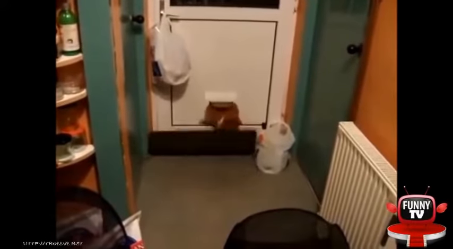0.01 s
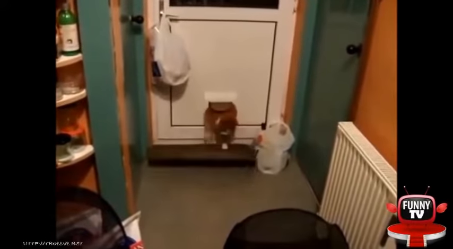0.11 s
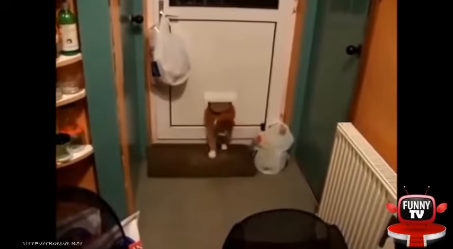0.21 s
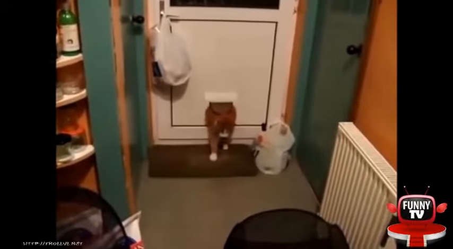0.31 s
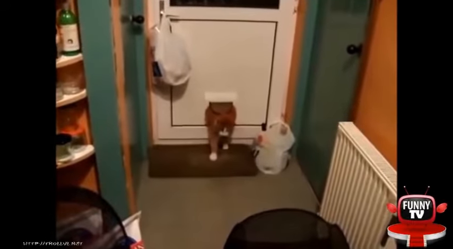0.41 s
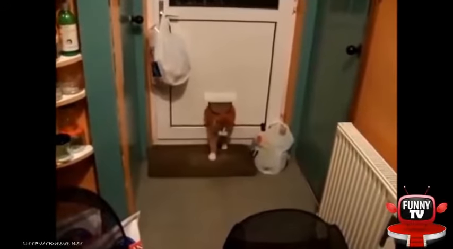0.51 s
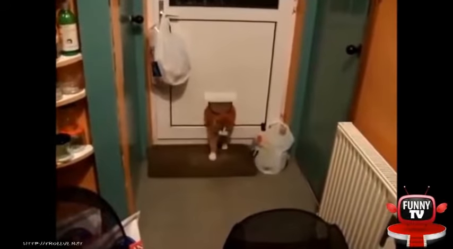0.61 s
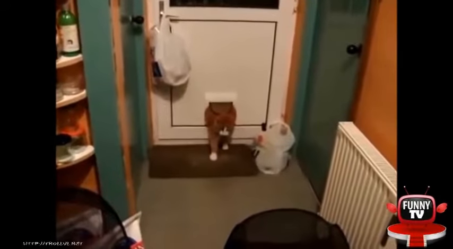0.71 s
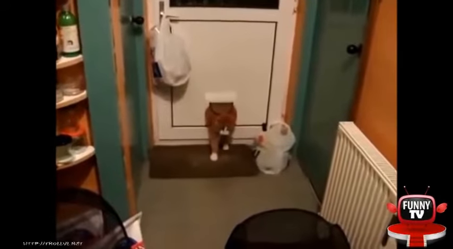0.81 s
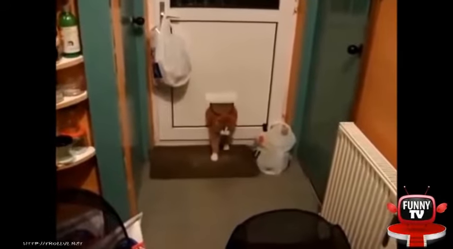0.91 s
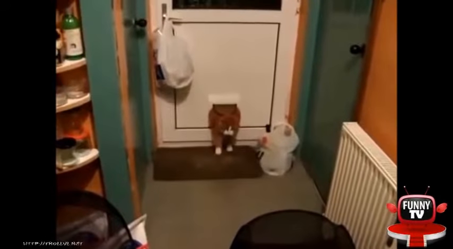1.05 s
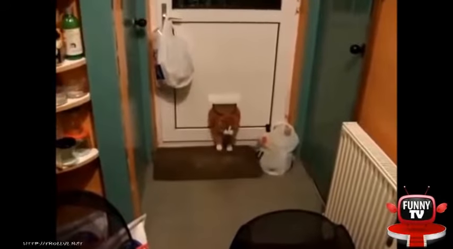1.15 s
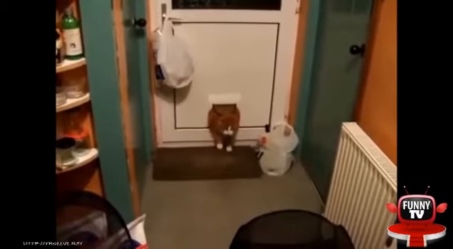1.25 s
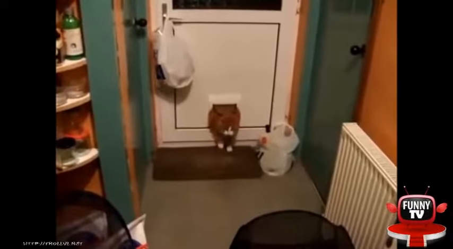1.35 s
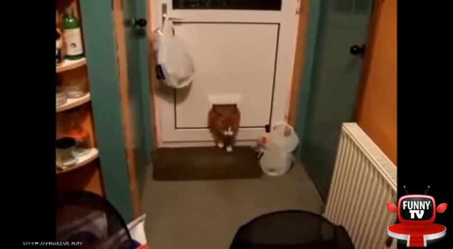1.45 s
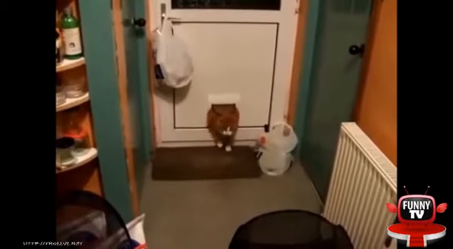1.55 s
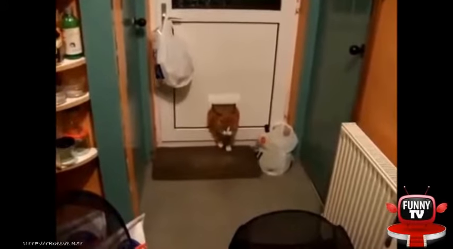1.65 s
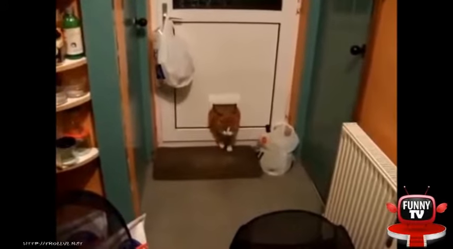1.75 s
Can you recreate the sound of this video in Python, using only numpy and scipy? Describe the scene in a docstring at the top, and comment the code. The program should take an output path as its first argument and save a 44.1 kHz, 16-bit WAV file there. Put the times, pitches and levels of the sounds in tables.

```python
"""In a small hallway, a cat squeezes through a plastic flap in the back door.
Random slips make the flap hiss over its fur, gliding tones make it creak, and soft pushes shake the door.
The flap slams and rattles: each blow mixes noise bursts with the ringing of the door and the flap's rim.
A short squeaky scuff and a soft paw fall follow. Wavering tones make a faint appliance hum under hiss."""
import sys
import numpy as np
from scipy import signal
from scipy.fft import rfft, irfft
from scipy.io import wavfile
from scipy.ndimage import uniform_filter1d, map_coordinates

SR = 44100
rng = np.random.default_rng(int(sys.argv[2]) if len(sys.argv) > 2 else 0)


def int16_out(signal):
    """Quantize to a 16-bit WAV file."""
    q = np.round(np.clip(np.atleast_2d(signal).T, -1, 1) * 32767)
    wavfile.write(sys.argv[1], SR, q.astype(np.int16))


N = 79380  # length in samples: 1.8 s


def amp(db):
    """Turn decibels into gain."""
    return 10 ** (np.asarray(db) / 20)


def unit(x):
    """Scale x to an rms of 1."""
    return x / np.sqrt(np.mean(x ** 2) + 1e-20)


def clock():
    """The time of every sample, in seconds."""
    return np.arange(N) / SR


def bins():
    """The frequencies of a spectrum of 2 * N samples, in Hz."""
    return np.fft.rfftfreq(2 * N, 1 / SR)


def along(points, hz):
    """Join (f/Hz, value) points by straight lines on a log frequency axis."""
    f, v = np.transpose(points)
    return np.interp(np.log(hz + 1), np.log(f + 1), v)


RELEASE_DB_PER_S = 907  # how steeply a layer fades before its first point and after its last


def level(rows):
    """Gain that follows (t/s, level/dB) points and fades quickly outside them."""
    s, db = np.transpose(rows)
    t = clock()
    seconds_outside = np.abs(t - np.clip(t, s[0], s[-1]))
    return amp(np.interp(t, s, db) - RELEASE_DB_PER_S * seconds_outside)


def wobble(rate):
    """A smooth random curve with `rate` random points a second."""
    knots = rng.standard_normal(int(N * rate / SR) + 4)
    return map_coordinates(knots, [clock() * rate])


def coloured(x, points):
    """Filter x by (f/Hz, level/dB) points, without pre-echo, keeping the power of white noise."""
    gain = unit(amp(along(points, bins())))
    # folding the cepstrum forward in time makes the filter respond only after its input
    cepstrum = irfft(np.log(gain))
    cepstrum[1:N] *= 2
    cepstrum[N + 1:] = 0
    return irfft(rfft(x, 2 * N) * np.exp(rfft(cepstrum)))[:N]


def fade(t, t60):
    """Exponential decay that drops 60 dB in t60 seconds."""
    return np.exp(-np.log(1000) * t / np.maximum(t60, 1e-3))


def at(s, x):
    """Delay x so that it starts at s seconds."""
    return np.pad(x, (max(round(s * SR), 0), 0))[:N]


def ring(modes, attack_s):
    """A struck body rings as a sum of dying sines, with a softened start."""
    t = clock()
    sines = sum(amp(db) * fade(t, t60) * np.sin(2 * np.pi * hz * t) for hz, db, t60 in modes)
    return sines * (1 - np.exp(-t / attack_s))


def tone(hz, waver, rate):
    """A sine of rms 1 whose pitch wavers at random."""
    unsteady_hz = hz * (1 + waver * wobble(rate))
    return np.sqrt(2) * np.sin(2 * np.pi * np.cumsum(unsteady_hz) / SR)


PATCHY_DB = 2.5  # how unevenly the rubbing lights up the resonances


def friction(colour, slips_per_s, smooth):
    """Rubbing is tiny random slips over a smooth hiss, patchy in time and pitch, coloured by the body."""
    slips = (rng.random(N) < slips_per_s / SR) * rng.standard_normal(N)
    z = signal.stft(unit(slips) + smooth * rng.standard_normal(N), nperseg=512)[2]
    patches = uniform_filter1d(rng.standard_normal(z.shape), size=4, axis=0)
    patches = uniform_filter1d(patches, size=7, axis=1)
    rub = signal.istft(z * amp(PATCHY_DB * unit(patches)), nperseg=512)[1][:N]
    return unit(coloured(rub, colour))


# the flap's contacts with its frame: t/s, direction (1 closing, -1 rebounding),
# door ring level/dB, knock level/dB (the noise part also takes RATTLE_DB), click level/dB
BLOWS = [ (.4484, 1, -30.5, -33, -40), (.455, 1, -38.5, -29, -33), (0.466, 1, -55, -42, -25),
         (.4699, -1, -32.5, -21, -24), (.4727, 1, -22, -7, -13.5), (.4767, -1, -15.5, -10.5, -36),
         (.5224, 1, -34, -28, -49), (.5334, -1, -37, -25.5, -47), (.5507, -1, -28, -30, -49), ]
# ringing of the door panel: f/Hz, relative level/dB, t60/s
DOOR = [(85, -16, .32), (148, -11.5, .39), (198, -8.5, .37), (285, -4.5, .32), (317, -1.5, .15),
        (341, -2, .3), (360, 9.5, .07), (378.5, -4, .3), (429.5, -4.3, .38), (539, -12, .31), (585, 6, .04),
        (770, -22, .25), (835, -16, .2), (902, -19, .36)]
# ringing of the flap's hard rim and catch: f/Hz, level/dB before RIM_DB, t60/s
RIM = [(1522, 6.5, 0.049), (2670, -23, 0.2), (2875, 4, 0.025), (7370, -9, 0.16), (8000, -22, 0.045),
       (8700, -15, 0.17)]
# tone colour of the hollow frame's knock: f/Hz, relative level/dB
KNOCK_COLOUR = [(30, -21), (55, -6.5), (90, 0.5), (150, 1), (195, 0), (245, -4.5), (320, 6), (430, 4.5),
                (500, -2.5), (590, -3), (700, -7.5), (850, -8.5), (1100, -8), (1600, -14), (2200, -19),
                (3000, -19.5), (6000, -29.5), (12000, -72)]
# tone colour of the rim's click: f/Hz, relative level/dB
CLICK_COLOUR = [(500, 8.5), (1500, -10), (2900, -1), (4300, 1.5), (5400, -21), (6700, 3), (7350, 6),
                (7800, 4.5), (8500, -3), (9400, -33), (11200, -4), (13500, -27), (15200, -14)]
KNOCK_T60, CLICK_T60 = 0.042, 0.03  # s
RATTLE_DB, RIM_DB = -1, -11  # the frame's noisy knock; the rim's ring within the click
PUSH_S, PUSH_DB = .0011, 2.5  # the flap's shove of air: width, and level relative to the knock
CLICK_LEAD_S = .0014  # the rim touches just before the whole flap lands
HALL_KNOCK_DB, HALL_CLICK_DB = -4.5, -15  # reverb on each


def flap_slam():
    """Each contact clicks the rim, knocks the frame and rings the door; rebounds push the other way."""
    t = clock()
    door = ring(DOOR, attack_s=0.0031)
    rim = amp(RIM_DB) * ring(RIM, attack_s=0.00023)
    push = amp(PUSH_DB) * shove(PUSH_S)
    out = np.zeros(N)
    for s, direction, door_db, knock_db, click_db in BLOWS:
        knock = coloured(rng.standard_normal(N) * fade(t, KNOCK_T60), KNOCK_COLOUR)
        click = coloured(rng.standard_normal(N) * fade(t, CLICK_T60), CLICK_COLOUR) + rim
        panel = -np.sign(direction) * (amp(door_db) * door + amp(knock_db) * push)
        out += at(s, panel + amp(knock_db + RATTLE_DB) * hallway(knock, HALL_KNOCK_DB))
        out += at(s - CLICK_LEAD_S, amp(click_db) * hallway(click, HALL_CLICK_DB))
    return out


PUSH_LOW_HZ = 125  # pitches below this are weakened


def shove(width_s):
    """A flat panel pushes the air once: a short swing under a bell curve, with the deep bass removed."""
    u = clock() / (2 * width_s)
    pulse = np.sin(np.pi * u) * np.exp(-u ** 2)
    highpass = signal.butter(2, PUSH_LOW_HZ, 'highpass', fs=SR, output='sos')
    return signal.sosfilt(highpass, pulse)


# hiss of the flap dragging over the cat's fur: t/s, level/dB before FUR_DB
FUR = [(0, -66), (.03, -48), (.052, -71), (.079, -53), (.083, -44), (.13, -34.5), (.166, -30.5), (.21, -31),
       (.24, -35.5), (.265, -31.5), (.35, -37), (.42, -36), (.462, -30.5), (.47, -28)]
# fur still brushing the frame after the slam: t/s, level/dB
RUSTLE = [(.5, -40.5), (.58, -51.5), (.615, -47), (.64, -55), (.662, -46), (.695, -57), (.725, -71)]
# scrape of the plastic: t/s, level/dB before SCRAPE_DB
SCRAPE = [(0, -57), (.028, -40), (.05, -49.5), (.0785, -58), (.0815, -33.5), (.108, -39), (.135, -44.5),
          (.155, -33.5), (.24, -40), (.268, -31), (.33, -37), (.425, -49), (.452, -34), (.468, -30)]
# low rumble of the door: t/s, level/dB before SHUDDER_DB
SHUDDER = [(.0, -56.5), (.13, -57), (.175, -45), (.2, -36), (.24, -30), (.268, -29), (.3, -28), (.34, -39),
           (.37, -45.5), (.41, -51.5), (.44, -36.5)]
# tone colours of fur, scrape and rumble: f/Hz, relative level/dB
FUR_COLOUR = [(600, -36), (1500, -6.5), (2400, 0), (3100, -2.5), (5000, 2), (7400, 2), (8300, -4.5),
              (9200, -11.5), (11800, -11), (13200, -24), (15500, -21.5)]
SCRAPE_COLOUR = [(250, -34), (520, 0), (640, -6), (820, 1), (960, -6), (1100, -3), (1400, -17), (2600, -11),
                 (5000, -21.5), (9000, -48)]
SHUDDER_COLOUR = [(30, -25), (80, -10), (150, 0.5), (240, -5.5), (310, 3.5), (360, -1.5), (430, -7),
                  (520, -9), (900, -72.5)]
FUR_DB, SCRAPE_DB, SHUDDER_DB = -2, 0, -1.5
HALL_SOFT_DB = -9.5  # reverb on the soft sounds: the drag and the steps


def flap_drag():
    """The flap rides over the cat's back: friction of fur and plastic, creaks, and a shuddering door."""
    fur_level = amp(FUR_DB) * level(FUR) + level(RUSTLE)
    fur = fur_level * friction(FUR_COLOUR, slips_per_s=3200, smooth=1.3)
    scrape = amp(SCRAPE_DB) * level(SCRAPE) * friction(SCRAPE_COLOUR, slips_per_s=660, smooth=0.72)
    shudder = amp(SHUDDER_DB) * level(SHUDDER) * friction(SHUDDER_COLOUR, slips_per_s=600, smooth=1.07)
    return hallway(fur + scrape + shudder + creaks() + bumps(), HALL_SOFT_DB)


# squeaks of the flap as it is pushed up: start t/s, length/s, first f/Hz, last f/Hz,
# level/dB, pitch waver (fraction of f)
CREAK = [(0.0803, 0.012, 720, 695, -41, 0.13), (0.0804, 0.019, 2400, 2760, -41, 0.07),
         (0.092, 0.037, 433, 415, -35.5, .012), (0.11, 0.076, 796, 773, -39.5, 0.02),
         (0.091, 0.02, 1126, 1165, -44, 0.04), (0.118, 0.053, 1175, 1139, -42, 0.03),
         (0.117, 0.029, 2060, 2190, -51, .01), (0.152, .022, 2610, 2540, -48, 0),
         (0.192, 0.051, 300, 320, -33.5, 0), (0.215, 0.023, 1032, 1047, -35.5, 0),
         (0.249, 0.03, 397.8, 336, -28.5, .06), (0.259, 0.025, 2500, 2380, -44, .05),
         (0.313, 0.013, 2845, 2690, -46, 0.1), (0.313, .024, 1796, 1860, -42.5, 0.04),
         (0.326, 0.017, 815, 852, -34, .008)]


def creaks():
    """Plastic sticks and slips: short gliding squeaks, some clean, some raspy."""
    out = np.zeros(N)
    for s, length, start_hz, end_hz, db, waver in CREAK:
        progress = np.clip((clock() - s) / length, 0, 1)
        swell = np.sqrt(np.abs(np.sin(np.pi * progress)))
        hz = start_hz + (end_hz - start_hz) * progress
        out += amp(db) * swell * tone(hz, waver, rate=500)
    return out


# nudges of the cat's body against the door: t/s, level/dB
BUMPS = [(0.141, -39), (0.192, -28), (0.236, -24), (0.268, -33.5), (.288, -28), (.31, -35.5), (.35, -40)]
BUMP_S, BUMP_RING_DB, BUMP_T60 = 0.0021, -12, .2  # push width/s, door ring level, extra damping t60/s


def bumps():
    """The cat's body nudges the door softly and damps its ring."""
    damped_ring = ring(DOOR, attack_s=.004) * fade(clock(), BUMP_T60)
    thud = shove(BUMP_S) + amp(BUMP_RING_DB) * damped_ring
    return sum(at(s, amp(db) * thud) for s, db in BUMPS)


# the scuff as the cat steps off the mat: t/s, level/dB
SCUFF = [(1.202, -54), (1.209, -44), (1.222, -48.5), (1.238, -47), (1.257, -45), (1.272, -60)]
# tone colour of the scuff: f/Hz, relative level/dB
SCUFF_COLOUR = [(200, -46), (520, -3), (700, 1), (840, 3), (1000, -4), (1300, -2), (1800, -10),
                (2150, -6.5), (3500, -15), (7000, -20.5), (11000, -38)]
# ringing of the floor under the paw: f/Hz, level/dB before PAW_DB, t60/s
FLOOR = [(125, -10, .16), (155, -7, .17), (225, -6, .1), (333, 2, .08), (440, -5, .05), (515, -2.5, .05),
         (665, -4.5, .05), (790, -11, .08), (890, -11, .08)]
SQUEAK_HZ, SQUEAK_RISE_HZ_PER_S = 760, 2360  # pitch at the start of the scuff, and its climb
SQUEAK_DB, SQUEAK_WAVER = -4.5, 0.0374  # level relative to the rub; pitch waver as a fraction
PAW_S, PAW_DB, PAW_ATTACK_S = 1.3405, -30, .0026


def steps():
    """A brief rub with a rising squeak, then one padded paw that makes the floor ring."""
    rub = friction(SCUFF_COLOUR, slips_per_s=900, smooth=1.0)
    hz = SQUEAK_HZ + SQUEAK_RISE_HZ_PER_S * np.maximum(clock() - SCUFF[0][0], 0)
    squeak = amp(SQUEAK_DB) * tone(hz, SQUEAK_WAVER, rate=150)
    scuff = level(SCUFF) * (rub + squeak)
    paw = at(PAW_S, -amp(PAW_DB) * ring(FLOOR, PAW_ATTACK_S))
    return hallway(scuff + paw, HALL_SOFT_DB)


# the appliance's tones: middle f/Hz, middle level/dB
HUM = [(145.3, -72), (333.8, -67.5), (421, -58.5), (823.6, -71)]
# tone colour of the microphone hiss: f/Hz, relative level/dB per Hz
HISS = [(12, -1.5), (25, 1), (50, -2.5), (70, -9), (105, -3), (190, -10), (230, -12.5), (325, -6.5),
        (420, -7), (490, -12), (800, -14), (1100, -14.5), (1640, -18), (3500, -20.5), (7800, -22),
        (9000, -34), (12000, -35), (13200, -45), (15700, -53)]
HUM_WAVER, HUM_FLUTTER_DB = 0.0063, 1  # pitch waver as a fraction; unsteadiness of the level
HISS_DB = -49.5


def room_tone():
    """A distant appliance hums, wavering in pitch and level, under steady filtered noise."""
    hum = np.zeros(N)
    for hz, db in HUM:
        unsteady_gain = amp(db + HUM_FLUTTER_DB * wobble(12.27))
        hum += unsteady_gain * tone(hz, HUM_WAVER, rate=13.83)
    hiss = unit(coloured(rng.standard_normal(N), HISS))
    return hum + amp(HISS_DB) * hiss


# how long the hallway echoes: f/Hz, t60/s
HALL = [(100, 0.5), (400, 0.46), (1500, 0.32), (4000, 0.26), (10000, 0.41)]
HALL_BUILD_S = 0.0088  # how gradually the reverb swells in


def hallway(x, wet_db):
    """Add reverb: a fresh noise tail that swells in, then dies away at its own pace in each band."""
    noise = rng.standard_normal(SR * 3 // 4)
    hz, t, z = signal.stft(noise, SR, nperseg=256)
    tail = signal.istft(z * fade(t, along(HALL, hz)[:, None]), SR, nperseg=256)[1]
    tail = tail * (1 - np.exp(-(clock()[:len(tail)] / HALL_BUILD_S) ** 2))
    return x + amp(wet_db) * signal.fftconvolve(x, tail / np.linalg.norm(tail))[:N]


# stereo width of the flap: f/Hz, side level/dB relative to the middle
WIDTH = [(100, -54), (500, -43), (2000, -19.5), (7000, -19), (12000, -13)]
BALANCE_DB = 0.08  # the flap's right channel is raised and its left lowered by this much


def scene():
    """A short random filter gives the flap a faint stereo side, mostly in the treble; the rest is mono."""
    flap = flap_drag() + flap_slam()
    scatter = rng.standard_normal(SR // 100)  # 10 ms of random noise
    spread = rfft(scatter / np.linalg.norm(scatter), 2 * N) * amp(along(WIDTH, bins()))
    side = irfft(rfft(flap, 2 * N) * spread)[:N]
    left = (flap - side) * amp(-BALANCE_DB)
    right = (flap + side) * amp(BALANCE_DB)
    return np.array([left, right]) + steps() + room_tone()


TOP_HZ = 15800


def record(dry):
    """Round off the tallest peaks smoothly and keep only what lies below TOP_HZ."""
    limited = dry / (1 + np.abs(dry / .92) ** 8) ** (1 / 8)
    return irfft(rfft(limited, 2 * N) * (bins() < TOP_HZ))[:, :N]


dry = scene()
out = record(dry)
int16_out(out)
```